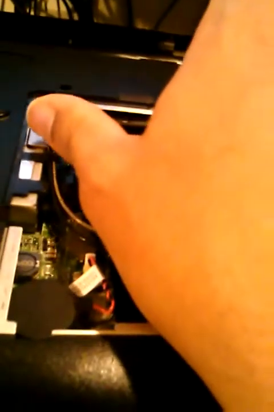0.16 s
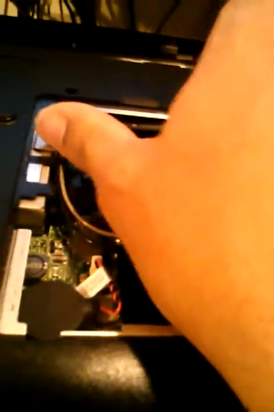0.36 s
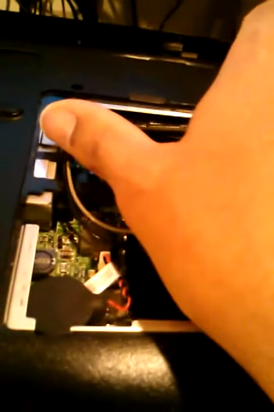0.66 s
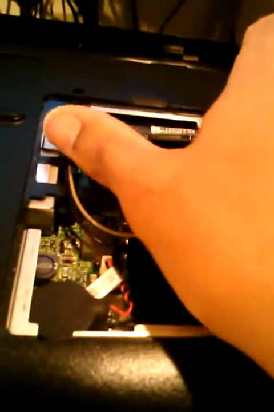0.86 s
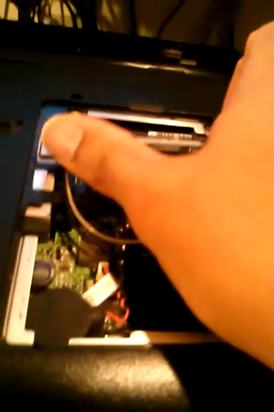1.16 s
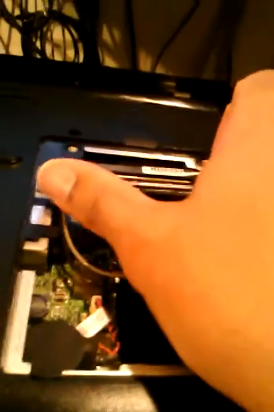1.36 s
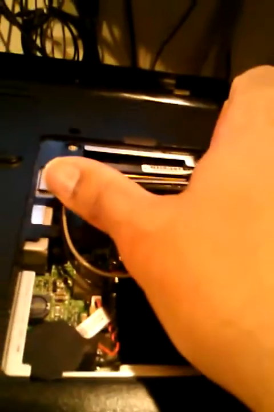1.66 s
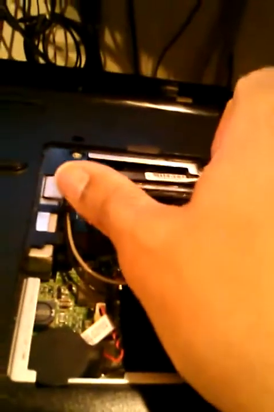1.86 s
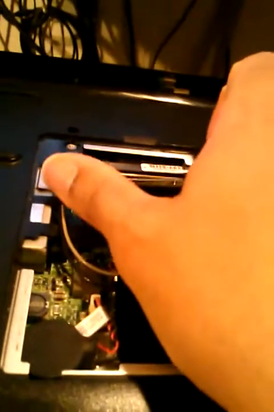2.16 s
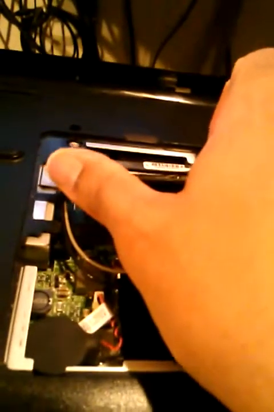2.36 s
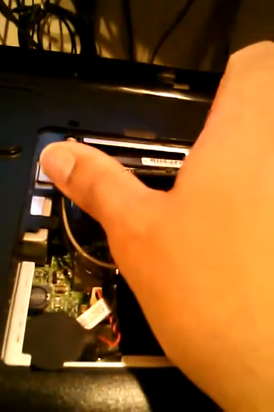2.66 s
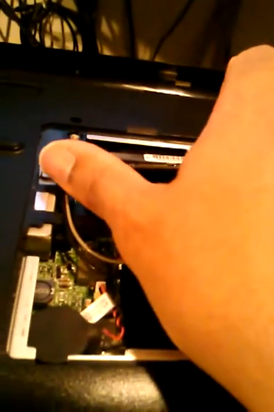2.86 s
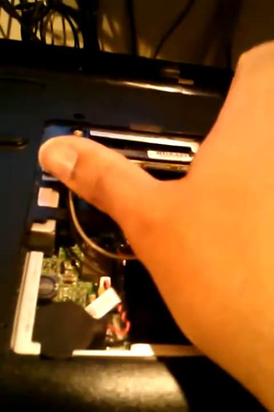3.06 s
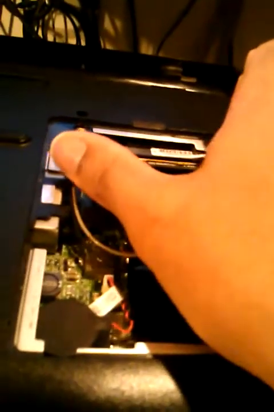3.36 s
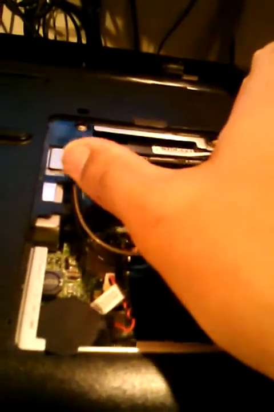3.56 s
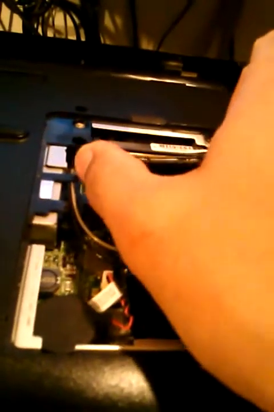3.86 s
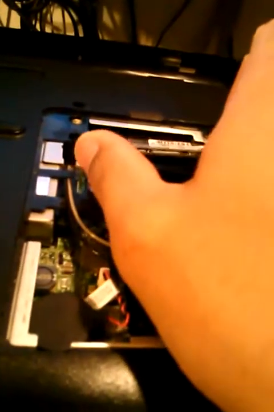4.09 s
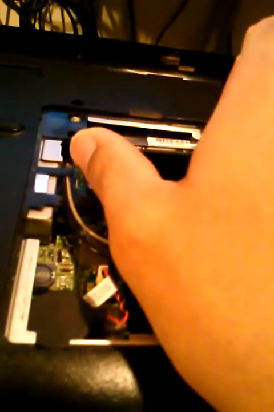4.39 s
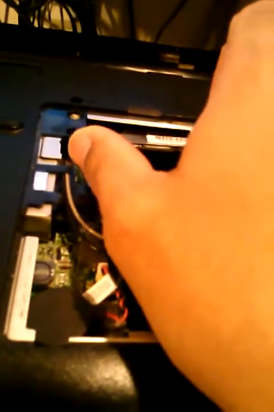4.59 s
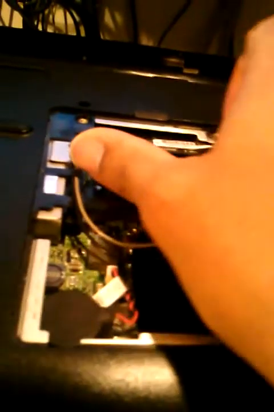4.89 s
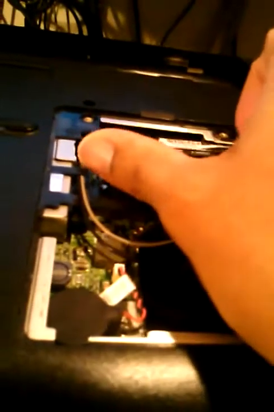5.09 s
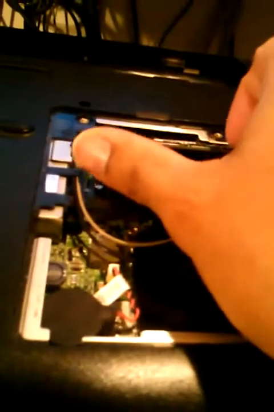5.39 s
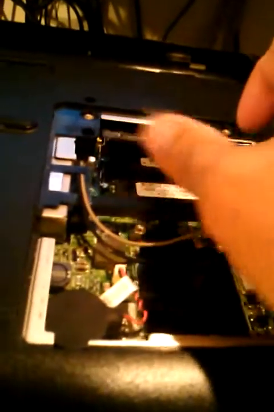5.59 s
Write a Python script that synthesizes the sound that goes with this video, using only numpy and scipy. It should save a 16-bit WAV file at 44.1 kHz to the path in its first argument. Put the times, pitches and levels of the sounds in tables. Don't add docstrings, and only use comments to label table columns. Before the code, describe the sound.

Faint handling knocks and tiny metallic ticks over a fluttering low hum, broken by one sharp hollow snap around three seconds.

```python
import sys
import numpy as np
from scipy import signal
from scipy.fft import rfft, irfft, next_fast_len
from scipy.io import wavfile
from scipy.ndimage import uniform_filter1d, map_coordinates

SR = 44100
rng = np.random.default_rng(int(sys.argv[2]) if len(sys.argv) > 2 else 0)


def wrap_up_sound(samples):
    columns = np.atleast_2d(samples).T
    tamed = np.clip(columns, -1, 1)
    steps = np.round(tamed * 32767).astype(np.int16)
    wavfile.write(sys.argv[1], SR, steps)


def decibels_to_gain(level_db):
    exponent = np.asarray(level_db, float) / 20
    return 10 ** exponent


N = 253134

# frequency in Hz, density in dB per Hz.
HISS = [(290, -33.5), (500, 5.5), (621, -12.5), (946, -3), (1420, -9), (1570, -10), (3810, -14.5),
        (4340, -19), (8960, -14.5), (16000, -18.5)]
RUMBLE = [(29, -23.5), (50, -6.5), (81, -21), (123, -18), (147, -13.5), (367, -23), (473, -26),
          (617, -28.5), (1200, -46.5), (1560, -74), (2640, -120)]
SHAKE = [(1.8, -33.5), (3.0, 3), (22, -0.5), (34, -18.5), (70, -19.5), (91, -47.5), (150, -120)]
# frequency in Hz, level in dB over the rumble.
HUM = [(97, -1.5), (119.5, -1.5)]

# start in seconds, length in seconds, shake in dB,
# gate opening in dB relative to fully open.
MOVES = [(0.4, 0.077, -49, -3.5), (0.537, 0.071, -45, -1), (0.816, 0.24, -46, -3.5),
         (1.246, 0.034, -62, -11), (1.347, 0.088, -44.5, 2.5), (1.494, 0.083, -46, -2.5),
         (1.657, 0.062, -49, -4), (1.759, 0.055, -43, 1), (1.878, 0.036, -41.5, -2.5),
         (2.165, 0.044, -46, -2), (2.368, 0.021, -53, -12), (2.404, 0.085, -44.5, -6.5),
         (2.694, .22, -53.5, -6), (3.025, .17, -49, 0), (3.379, 0.052, -41.5, -1.5), (3.569, 0.11, -41, -1),
         (3.824, .14, -53, -11), (4.295, 0.18, -54.5, -12), (4.489, .06, -51, -2), (4.58, 0.062, -43, -0.5),
         (4.663, .05, -51, -8), (4.722, 0.11, -50.5, -3.5), (4.855, 0.031, -48, 3), (5.027, 0.079, -40, -2),
         (5.143, 0.486, -42, -1)]
# start in seconds, shake in dB, gate opening in dB.
NUDGES = [(0.047, -47.5, -7), (0.1, -60, -15), (0.23, -45, -3), (0.318, -46, -4), (0.738, -48, -7.5),
          (0.825, -35.5, -0.5), (0.898, -33, -3), (0.976, -32, -1), (1.157, -39.5, 1), (1.2, -56, -8),
          (1.347, -31, 3.5), (1.535, -42, 4), (1.996, -42.5, -2.5), (2.255, -48, -3.5), (2.451, -38.5, -1),
          (2.547, -42, -0.5), (2.82, -43, -2), (2.872, -39.5, -1.5), (3.165, -36, 0), (3.275, -41, -0.5),
          (3.506, -49, -5), (3.599, -38, 7), (4.111, -69, -15), (4.195, -58, -1.5), (4.492, -40, -0.5),
          (5.065, -35, -1.5), (5.415, -36, 1), (5.57, -41, 2.5), (5.68, -53, -7)]

# frequency in Hz, width in Hz, level in dB.
LOW_MODES = [(553, 88, -13), (815, 150, -3), (885, 300, -2.5), (999, 250, 0.5), (998, 160, -0.5)]
HIGH_MODES = [(1270, 210, -3.5), (1454, 170, 3), (1500, 110, -5), (1579, 87, 1), (1789, 180, -5.5)]
CLIP_MODES = [(2215, 270, 7), (2547, 460, 6), (3100, 430, 1.5), (3700, 550, 0), (4270, 330, 2),
              (5170, 460, -3.5), (6560, 790, -6), (7880, 930, -8), (10200, 1500, -12.5),
              (13600, 3000, -24.5)]
# frequency in Hz, width in Hz.
DIPS = [(635, 90), (2800, 110)]
# frequency in Hz, t60 in seconds.
DESK = [(500, 0.13), (2000, 0.25), (10000, 0.26)]

# time in seconds,
# low knock peak in dB, high knock in dB and clips in dB (both over the low knock).
CLICKS = [(0.324, -43.5, -9, -30), (2.038, -59, 5.5, -17), (2.168, -33, 3, 0.5), (2.179, -45.5, 8, 1.5),
          (2.319, -50, -17, -23), (2.446, -53.5, -28, -32), (2.463, -51, 0, -11.5), (2.565, -66, 12, -12),
          (2.753, -57, -13, -19.5), (3.514, -47.5, -27.5, -29), (4.192, -48.5, 3, -10.5),
          (4.301, -56, -31, -22), (4.434, -50.5, -29, -28), (4.788, -47.5, -18, -12)]
KNOCKS = [(0.126, -51.5, -11, -22), (0.444, -33, -18, -18), (0.598, -49.5, -5, -3.5),
          (1.39, -36.5, -4.5, -19), (1.673, -34.5, 0.5, -0.5), (1.904, -57.5, 6.5, -3), (1.931, -72, 9, 1),
          (2.147, -35, -6.5, -18.5), (2.157, -43, 0, -9), (2.678, -38, -15.5, -22), (2.741, -42.5, -6, -41),
          (2.858, -47, -2.5, -22), (3.045, -16, -2.5, -1), (3.385, -52.5, -29, -22), (3.423, -57, -27, -21),
          (3.802, -67, -27, -17), (3.857, -52, 2.5, -13.5), (3.879, -50, -3, -16),
          (4.109, -53.5, -10.5, -26), (4.144, -56.5, -9.5, -28), (4.199, -42, -5.5, -8.5),
          (4.525, -38, 3.5, -34), (4.801, -47, -3, -6.5), (4.859, -32, -5.7, -26),
          (4.884, -38.5, -5, -13.5), (5.148, -63, -20, -23), (5.214, -42.5, -3, -8.5)]
DRAGS = [(0.21, -59, -16, -19), (0.411, -46, -14, -21), (0.55, -50.5, 13, 6.5), (0.556, -47.5, 6.5, 2),
         (0.573, -38.5, -6, -34), (1.268, -60, -3.5, -9), (1.396, -33.5, -2.5, -16),
         (1.506, -46.5, -12, -16.5), (2.878, -59.5, -9.5, -17.5), (3.032, -38, -4.5, -8.5),
         (3.057, -25, 0, -3.5), (4.582, -51, -7, -24)]
RUBS = [(1.535, -42.5, -9.5, -20), (4.868, -38, -12, -17.5), (5.205, -51.5, -18, -4.5),
        (5.485, -61, -29.5, -20), (5.515, -50, -35.5, -40)]
# t60 in seconds, rise in ms.
KINDS = [(0.059, 1.66), (0.092, 1.05), (0.12, 2.5), (0.22, 6.2)]

# time in seconds, frequency in Hz, peak in dB.
CASE_PINGS = [(0.308, 990, -59), (0.401, 1130, -50.5), (0.412, 1030, -50), (0.45, 564, -41),
              (1.275, 1500, -67), (1.372, 1500, -44), (1.391, 933, -26.5), (1.398, 940, -24),
              (1.402, 555, -42), (1.51, 920, -58), (1.555, 866, -40), (1.93, 1410, -48), (2.147, 930, -39),
              (2.156, 940, -38), (2.169, 1380, -36), (2.566, 1572, -36.5), (3.032, 1000, -39),
              (3.045, 957, -9.5), (2.9, 1100, -54.5), (3.2, 900, -49), (4.201, 1270, -40),
              (4.524, 1114, -28.5), (4.526, 1590, -42), (5.214, 1606, -59), (5.238, 1600, -69),
              (5.537, 994, -38), (5.546, 1130, -40)]
CLIP_PINGS = [(1.263, 10050, -65.5), (1.281, 2490, -75), (1.361, 9850, -56), (1.365, 5800, -55.5),
              (1.392, 10200, -42.5), (1.906, 5660, -58), (1.929, 5930, -55), (1.932, 4200, -59.5),
              (2.038, 5540, -58), (2.038, 9000, -62), (2.466, 2470, -52.5), (2.565, 2400, -63),
              (2.567, 4670, -65), (3.021, 10200, -53.5), (3.858, 2320, -54.5), (3.869, 9940, -63),
              (3.874, 2700, -57.5), (4.525, 2420, -46), (4.786, 8200, -59), (4.801, 8000, -49),
              (4.802, 3470, -54), (4.802, 2480, -50), (4.812, 8300, -60), (4.86, 3700, -51),
              (4.862, 2460, -40), (5.213, 3100, -47), (5.217, 4120, -54), (5.217, 5960, -58)]
# frequency in Hz, peak in dB, t60 in seconds.
SEATED = [(766.7, -28, 0.18), (864, -20.5, .12), (1084, -20.5, .09), (1346, -25.5, 0.11),
          (1681, -21.5, 0.078), (1845, -25, 0.045), (3770, -30.5, 0.068), (4250, -31.5, 0.034),
          (6920, -37, .1)]


def unit(x):
    return x / np.sqrt(np.mean(x ** 2) + 1e-20)


def along(points, hz):
    f, v = np.transpose(points)
    return np.interp(np.log(hz + 1), np.log(f + 1), v)


def wobble(rate):
    knots = rng.standard_normal(int(N * rate / SR) + 4)
    return map_coordinates(knots, [np.arange(N) * rate / SR])


def noise(spectrum):
    m = next_fast_len(N + 8192)
    gain = decibels_to_gain(along(spectrum, np.fft.rfftfreq(m, 1 / SR)))
    return unit(irfft(rfft(rng.standard_normal(m)) * gain, m)[:N])


def resonance(f, centre, width):
    return 1j * f * width / (centre * centre - f * f + 1j * f * width)


def curves(spans, rise, fall, rest_db):
    t = np.arange(0, N + 64, 32) / SR
    start, length, db = np.transpose(spans)[..., None]
    before = np.maximum(start - t, 0)
    after = np.maximum(t - start - length, 0)
    each = db - rise * before - fall * after
    return np.interp(np.arange(N) / SR, t, np.maximum(each.max(axis=0), rest_db))


def motion():
    nudge_s = 0.021
    nudges = [(s, nudge_s, db, gate_db) for s, db, gate_db in NUDGES]
    rows = np.array(list(MOVES) + nudges)
    hand_db = curves(rows[:, :3], rise=1300, fall=700, rest_db=-59)
    gate_db = curves(rows[:, [0, 1, 3]], rise=2700, fall=282, rest_db=-20.5)
    return hand_db, gate_db


def background(hiss_db, rumble_db):
    t = np.arange(N) / SR
    flutter = wobble(23) + 0.51 * wobble(110)
    tones = 0
    for hz, db in HUM:
        level = decibels_to_gain(db + 1.6 * wobble(2.2))
        tones = tones + level * np.sin(2 * np.pi * hz * t + 1.0 * wobble(3.3))
    opening = decibels_to_gain(np.minimum(hiss_db, -75) + 2.4 * flutter) + decibels_to_gain(-92.5)
    rumble_gain = decibels_to_gain(np.minimum(rumble_db, -54) - 0.5 + 2.0 * flutter)
    rumble = rumble_gain * unit(noise(RUMBLE) + tones)
    return decibels_to_gain(10.5) * opening * noise(HISS) + rumble


def shake(hand_db):
    lurch = signal.hilbert(noise(SHAKE))
    size = uniform_filter1d(np.abs(lurch), size=1500)
    return decibels_to_gain(hand_db - 1.65) * unit(lurch.real / (size + 0.36))


def ring(force, modes, scatter_db):
    f = np.fft.rfftfreq(2 * len(force), 1 / SR)
    luck = scatter_db * rng.standard_normal(len(modes))
    body = 0
    for k, (hz, width, db) in enumerate(modes):
        body = body + (-1) ** k * decibels_to_gain(db + luck[k]) * resonance(f, hz, width)
    top_hz = modes[-1][0]
    soft = 1 / (1 + 1.1j * f / (1.82 * top_hz) - (f / (1.33 * top_hz)) ** 2) ** 2
    y = irfft(rfft(force, 2 * len(force)) * body * soft)[:len(force)]
    return y / np.abs(y).max()


def desk(x):
    hz, t, z = signal.stft(rng.standard_normal(len(x)), SR, nperseg=256)
    decay = decibels_to_gain(-60 * t / along(DESK, hz)[:, None])
    tail = signal.istft(z * decay, SR, nperseg=256)[1]
    return signal.fftconvolve(np.pad(x, (200, 0)), tail / np.linalg.norm(tail))[:len(x)]


def taps(open_db):
    out, t = np.zeros(N + SR), np.arange(8192) / SR
    open_db = np.pad(open_db, (0, SR), mode="edge")
    contacts = []
    for rows, kind in zip([CLICKS, KNOCKS, DRAGS, RUBS], KINDS):
        contacts += [(*row, *kind) for row in rows]
    for s, db, high_db, clip_db, t60, rise_ms in contacts:
        start = round((s - .001) * SR)
        rise_s = np.clip(rise_ms, .2, 20) / 1000
        slips = uniform_filter1d(rng.standard_normal(len(t)), size=40) * np.sqrt(40)
        rattle = decibels_to_gain(3.5 * slips) * decibels_to_gain(-60 * t / np.clip(t60, .01, .4))
        blow = 5 * decibels_to_gain(-60 * t / 0.0084)
        attack = 1 - np.exp(-(t / rise_s) ** 2)
        force = rng.standard_normal(len(t)) * (blow + rattle) * attack
        hit = ring(force, LOW_MODES, scatter_db=3.5)
        hit += decibels_to_gain(high_db) * ring(force, HIGH_MODES, scatter_db=4.0)
        hit += decibels_to_gain(clip_db + 4.5) * ring(force, CLIP_MODES, scatter_db=1.0)
        now_db = open_db[start:][:len(t)]
        closing_db = np.minimum(now_db - now_db[round(.02 * SR)], 0)
        shut_db = np.where(t > .02, closing_db, 0)
        out[start:][:len(t)] += decibels_to_gain(db + 0.76 * shut_db) * (hit + decibels_to_gain(-14) * desk(hit))
    return out[:N]


def radiated(x):
    f = np.fft.rfftfreq(N, 1 / SR)
    dips = np.prod([1 - 1.1 * resonance(f, hz, width) for hz, width in DIPS], axis=0)
    return irfft(rfft(x) * dips, N)


def pings():
    out, t = np.zeros(N + SR), np.arange(4096) / SR
    rings = [(s, hz, db, 0.031) for s, hz, db in CASE_PINGS]
    rings += [(s, hz, db, 0.038 * (hz / 3000) ** 0.51) for s, hz, db in CLIP_PINGS]
    attack = 1 - np.exp(-t / .0013)
    for s, hz, db, t60 in rings:
        drift = .003 * np.sqrt(hz) * np.cumsum(rng.standard_normal(len(t)))
        tone = decibels_to_gain(db - 60 * t / t60) * attack * np.sin(2 * np.pi * hz * t + drift)
        out[round((s - .001) * SR):][:len(t)] += tone + decibels_to_gain(-22) * desk(tone)
    return out[:N]


def snap():
    snap_s = 3.045
    t = np.arange(SR // 4) / SR
    drift = np.cumsum(rng.standard_normal((len(SEATED), len(t))), axis=1)
    modes = 0
    for (hz, db, t60), d in zip(SEATED, drift):
        modes = modes + decibels_to_gain(db - 60 * t / t60) * np.sin(2 * np.pi * hz * t + 0.014 * d)
    modes = modes * (1 - np.exp(-t / .001))
    return np.pad(modes + decibels_to_gain(-14) * desk(modes), (round((snap_s - .001) * SR), N))[:N]


def scene():
    hand_db, gate_db = motion()
    room = background(hiss_db=-77 + 1.27 * gate_db, rumble_db=-55 + gate_db)
    room = room + shake(hand_db + 0.42 * gate_db)
    return (radiated(taps(gate_db)) + room + pings() + snap())[None]


def roll_off(x):
    return signal.sosfilt(signal.butter(12, 16370, fs=SR, output="sos"), x)


def record(dry):
    kept = irfft(rfft(dry) * (np.fft.rfftfreq(N, 1 / SR) < 15800), N)
    return roll_off(kept)


dry = scene()
out = record(dry)
wrap_up_sound(out)
```